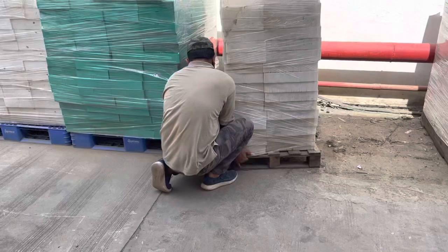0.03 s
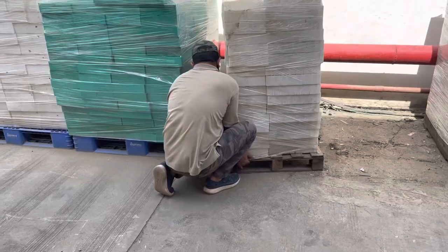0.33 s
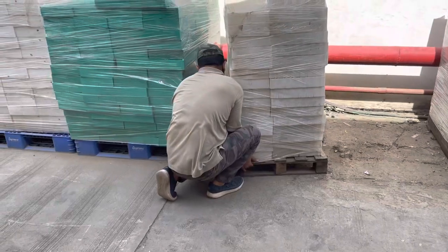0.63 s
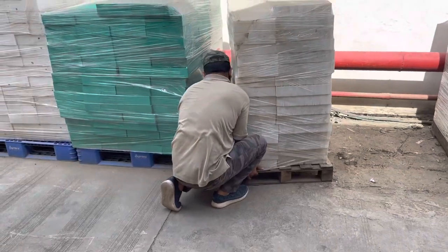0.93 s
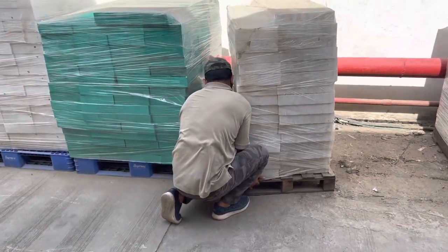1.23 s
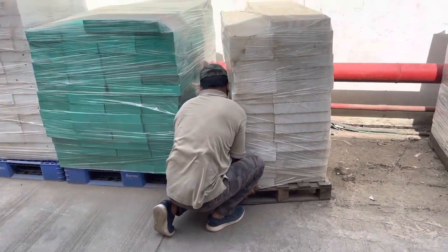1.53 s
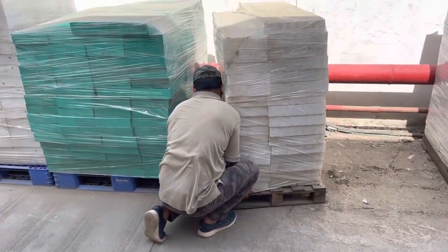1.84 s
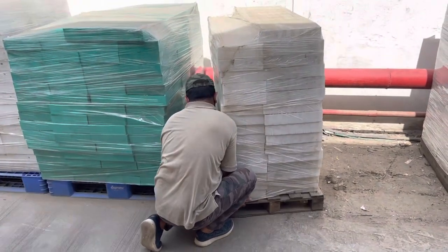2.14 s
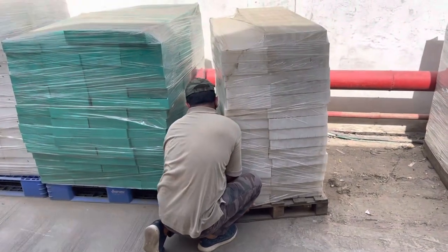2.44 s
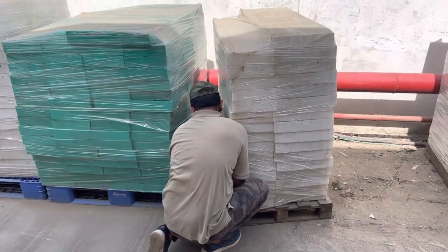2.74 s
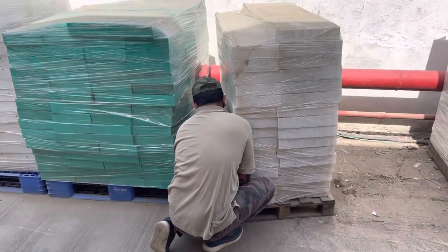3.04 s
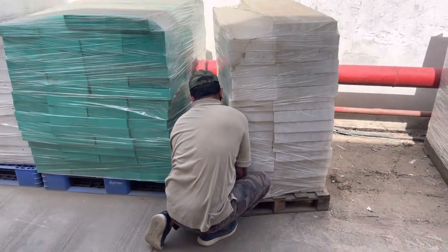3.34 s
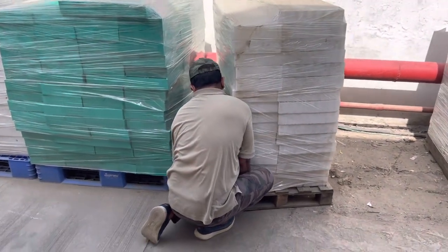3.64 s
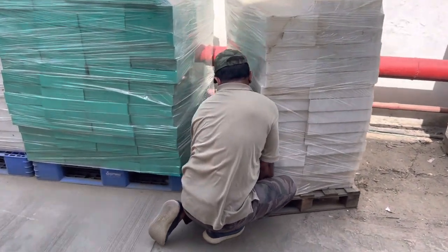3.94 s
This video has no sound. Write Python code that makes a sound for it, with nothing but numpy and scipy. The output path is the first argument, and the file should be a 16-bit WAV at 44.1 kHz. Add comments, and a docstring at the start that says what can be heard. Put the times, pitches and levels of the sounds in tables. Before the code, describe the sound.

Distant machinery rumbles and hums steadily throughout in a concrete yard, with a thin, high motor whine fading in and out. A faint whistle swells twice around 1.6 and 2.1 seconds, and far air hisses from 1.8 to 2.6. Light gusts buffet the microphone, mostly after 2 seconds. A soft low knock comes at 3.5, then plastic wrap rustles and scrapes, with a short high squeak at 3.9.

```python
"""Distant machines rumble and hum across a concrete factory yard, and one whistles faintly.
An inverter (a fast electric switch) feeds a motor and makes it whine near 5 kHz.
Air hisses from a far valve for most of a second, and light gusts buffet the microphone.
Near the end comes a soft knock, then plastic wrap rustles, scrapes and gives a short squeak."""
import sys
import numpy as np
from scipy import signal
from scipy.fft import rfft, irfft
from scipy.io import wavfile

SR = 44100
rng = np.random.default_rng(int(sys.argv[2]) if len(sys.argv) > 2 else 0)


def bounce(signal):
    """Save signal as a 16-bit WAV file at the path given by the first command-line argument."""
    frames = np.transpose(np.atleast_2d(signal))
    limited = np.clip(frames, -1, 1)
    pcm = np.round(limited * 32767).astype(np.int16)
    wavfile.write(sys.argv[1], SR, pcm)


N = 176400
TIME = np.arange(N) / SR

# "Mid" is the sound both ears share; "side" is how they differ.
# the mid part of the machines' roar: (frequency [Hz], level [dB])
ROAR_MID = [(20, -85), (32, -57), (48, -45), (115, -47.5), (195, -53), (240, -54.5), (420, -59), (700, -62),
            (1100, -66.5), (1500, -71), (2900, -77), (4200, -80.5)]
WANDER_HZ = 0.87  # how far the machines' tones stray in pitch


def roar():
    """Far machinery blurred by the yard: a fluttering rumble under thin hiss."""
    # the side part of the roar: (frequency [Hz], level [dB])
    roar_side = [(20, -85), (55, -71), (115, -76), (200, -65), (550, -61.5), (950, -66.5), (1600, -73.5),
                 (2900, -78.5), (4200, -80.5)]
    # steady hiss above it: (frequency [Hz], mid level [dB], side level [dB])
    thin_hiss = [(4190, -83, -91), (5740, -88, -81), (6400, -85.5, -93), (6950, -87.5, -93),
                 (8380, -103, -82), (9620, -89, -82), (11530, -93, -95), (12800, -101, -115),
                 (14000, -105, -125)]
    top_hz = thin_hiss[0][0]
    rumble = stereo(noise(ROAR_MID, high_hz=top_hz), noise(roar_side, high_hz=top_hz))
    flutter = from_db(-0.89 + 1.02 * drift(16))
    return flutter * rumble + hiss(thin_hiss)


def hums():
    """Engine and fan tones, wavering on their way across the yard."""
    # the clearest tones: (pitch [Hz], level [dB], side compared with mid [dB])
    engine_tones = [(38.4, -51, -20), (54.6, -32.5, -19), (74.53, -32.5, -36), (109.7, -32.5, -9.5),
                    (125.7, -37, -25), (222.9, -42.5, -10), (238.5, -41.5, -17), (300.4, -44.5, -11),
                    (380.3, -48.5, -28), (426.4, -48.5, -15), (643, -47.5, -22), (1892, -58.5, 0),
                    (2370, -61, -9), (2080, -59, -3)]
    # other machines add 40 faint tones at random pitches, just above the roar
    low_hz, high_hz = 800.2, 4189
    faint_hz = low_hz * (high_hz / low_hz) ** rng.random(40)
    roar_hz, roar_db = np.transpose(ROAR_MID)
    faint_db = np.interp(np.log(faint_hz), np.log(roar_hz), roar_db) + 9
    faint_tones = [(hz, db, -1) for hz, db in zip(faint_hz, faint_db)]
    out = 0
    for hz, db, side_db in list(engine_tones) + faint_tones:
        pitch = hz + WANDER_HZ * drift(2.69)
        mid, side = [from_db(2.5 * drift(2.23)) * tone(pitch) for _ in range(2)]
        out = out + from_db(db) * stereo(mid, from_db(side_db) * side)
    return out


def motor():
    """Electric switching makes a motor whine; echoes make it fade and shift differently at each ear."""
    # four main tones as the microphone moves through the echoes, each: (time [s], level [dB])
    low_tone = [(0.06, -57), (0.241, -47), (0.36, -47), (0.46, -43), (0.64, -40.5), (0.71, -43),
                (0.77, -60), (0.94, -58), (1.02, -47), (1.1, -54), (1.2, -48), (1.37, -51), (1.48, -49),
                (1.79, -56), (1.91, -48), (2.01, -61), (2.1, -41), (2.25, -51.5), (2.5, -45), (2.61, -54),
                (3.2, -60), (3.47, -51), (3.54, -57), (3.7, -50.5), (3.98, -56)]
    high_tone = [(0.06, -62), (0.65, -63), (0.73, -51), (0.86, -44), (0.94, -57), (1.02, -42), (1.21, -53),
                 (1.33, -42.5), (1.49, -56), (1.61, -45), (1.68, -67), (1.77, -47), (2.02, -53),
                 (2.12, -49), (2.3, -61), (2.48, -43.5), (2.6, -62), (2.67, -41.5), (2.82, -47),
                 (2.95, -59), (3.36, -56), (3.4, -43.5), (3.49, -40), (3.535, -60), (3.6, -43),
                 (3.665, -55), (3.72, -43.5), (3.82, -62), (3.93, -49)]
    third_tone = [(0.06, -51.5), (0.62, -51.5), (0.81, -59), (1.92, -46), (2.04, -60), (2.1, -51),
                  (2.17, -59), (3.35, -69), (3.5, -55), (3.98, -65)]
    fourth_tone = [(0.06, -59), (1.08, -58), (1.18, -51), (1.65, -55), (1.85, -55), (2.4, -53), (2.7, -63)]
    # the side part of the high tone: (time [s], level [dB])
    high_side = [(0.06, -53), (0.68, -58), (0.82, -43), (1.05, -65), (1.24, -45), (1.62, -44), (1.9, -52),
                 (2.2, -54), (2.47, -42), (2.63, -53), (3.02, -45), (3.24, -42), (3.38, -52), (3.49, -38),
                 (3.57, -52), (3.97, -48)]
    # weaker tones around the main ones: (pitch [Hz], level [dB])
    weak_tones = [(4626, -76), (4693, -57), (4775, -55.5), (4975, -72), (5025, -70), (5125, -70),
                  (5225, -60), (5306, -56.5), (5456, -60)]
    # their shared rise and fall: (time [s], level [dB])
    weak_swell = [(0, -6), (.8, -1), (2.7, -1), (3.2, -1), (3.5, -4)]
    # rasp of the motor's casing: (frequency [Hz], level [dB])
    rasp = [(4250, -86), (4550, -80.5), (5000, -75), (5380, -76.5), (5560, -109)]
    high_hz, boost_db = 5074.5, 0.5
    main = [(4924.8, low_tone), (high_hz, high_tone), (4875.0, third_tone), (4543.0, fourth_tone)]
    tones = [(hz, in_time(level)[0] + boost_db) for hz, level in main]
    swell_db = in_time(weak_swell)[0] - 1.5
    tones += [(hz, db + swell_db + 7.5 * np.tanh(drift(6.3))) for hz, db in weak_tones]
    out = stereo(noise(rasp, rasp[0][0], rasp[-1][0]), noise(rasp, rasp[0][0], rasp[-1][0]))
    for hz, db in tones:
        angle = 2 * np.pi * (hz * TIME + rng.random()) + 0.42 * drift(2.6)
        side_db = (db + db.mean()) / 2 - 3 + 4.1 * drift(1.8)
        if hz == high_hz:
            side_db = in_time(high_side)[0] + boost_db
        mid = from_db(db) * np.sin(angle)
        side = from_db(side_db) * np.cos(angle + 0.6 * drift(2.5))
        out = out + np.sqrt(2) * stereo(mid, side)
    return out * from_db([[1], [-1]])  # a little to the left


def gusts():
    """Swirling air hits the microphone in short, low swells."""
    # each gust: (time [s], half length [s], level [dB], centre frequency [Hz])
    puffs = [(0.764, 0.097, -26.5, 111), (1.486, 0.02, -24, 111), (2.156, 0.0095, -22, 75),
             (2.254, 0.032, -18.5, 76), (2.695, 0.031, -26, 81), (3.098, 0.04, -19.5, 84),
             (3.207, 0.013, -19.5, 89), (3.441, 0.015, -13.5, 109), (3.488, 0.016, -23, 170),
             (3.556, 0.01, -20, 104), (3.603, 0.015, -15, 95), (3.745, 0.038, -28.5, 132)]
    # the tone colour of a gust: (multiple of its centre frequency, level [dB])
    colour = [(.3, -33), (.65, -3.5), (1, 4), (1.5, -10.5), (2.6, -14.5), (5.5, -42), (18, -65)]
    out = 0
    for peak_s, half_s, db, hz in puffs:
        swell = np.exp(-.5 * ((TIME - peak_s) / half_s) ** 2)
        spectrum = [(hz * multiple, level) for multiple, level in colour]
        mid, side = [rms_one(swell * noise(spectrum, 25, 2000)) for _ in range(2)]
        strength = from_db(db) * np.sqrt(np.mean(swell ** 2))
        out = out + strength * stereo(mid, from_db(-12) * side)
    return out


def valve():
    """Compressed air spurts out, holds, and is shut off, leaving a faint tail in the yard."""
    # the jet of air: (frequency [Hz], mid level [dB], side level [dB])
    jet = [(2450, -88, -98), (4300, -77, -81), (6300, -82.5, -82), (7200, -83, -86), (8300, -130, -80),
           (9900, -85, -81), (10800, -85, -82), (12900, -90, -110), (15500, -98, -120)]
    open_s, rise_s, shut_s, fade_s = 1.78, 0.02, 2.58, 0.068
    since_open, since_shut = np.maximum(TIME - open_s, 0), np.maximum(TIME - shut_s, 0)
    flow = np.minimum(since_open / rise_s, 1) * np.exp(-since_shut / fade_s)
    spurt_db = 2.5 * np.exp(-since_open / .08)
    return from_db(-0.9 + spurt_db + 0.73 * drift(15)) * flow * hiss(jet)


def squeak():
    """Plastic wrap sticks and slips so fast that it gives a short, high note."""
    # the note's path: (time [s], pitch [Hz], level [dB])
    note = [(3.85, 4490, -72), (3.876, 4510, -45), (3.902, 4490, -52), (3.913, 4510, -33.5),
            (3.935, 4590, -48.5), (3.962, 4534, -45), (3.995, 4500, -69)]
    # the tones within the note: (multiple of the pitch, level [dB])
    harmonics = [(1, 6.5), (2, -10.5), (3, -21)]
    pitch, db = in_time(note)
    jitter_hz = 16.8
    shaky_pitches = [pitch + jitter_hz * drift(rate) for rate in (121, 120)]
    mid, side = [sum(from_db(level) * tone(multiple * hz) for multiple, level in harmonics)
                 for hz in shaky_pitches]
    loudness = from_db(db + 1.5 * drift(100)) * (TIME > note[0][0])
    return loudness * stereo(mid, from_db(-6) * side)


def scrape():
    """Rubbing plastic wrap makes a grainy noise."""
    # how loud the rub is: (time [s], level [dB])
    swell = [(3.55, -20), (3.68, -9), (3.78, -12), (3.885, -3), (3.93, -6.5), (4.0, -8)]
    # its tone colour: (frequency [Hz], level [dB])
    colour = [(900, -77), (2000, -67.5), (3200, -68.5), (5000, -92), (7000, -97), (15000, -125)]
    loudness = from_db(in_time(swell)[0] + 2 * drift(90)) * (TIME > swell[0][0])
    return loudness * stereo(noise(colour), noise(colour))


def rustle():
    """Plastic wrap crinkles finely and brightly, swelling ahead of the squeak."""
    # how loud the crinkles are: (time [s], level [dB])
    swell = [(3.55, -22), (3.74, -22), (3.8, -4), (3.9, -6.5), (4.0, -14)]
    # their tone colour: (frequency [Hz], mid level [dB], side level [dB])
    colour = [(3000, -75, -82), (6600, -80.5, -84), (8400, -100, -79), (11000, -86, -85),
              (15500, -101, -125)]
    grains = rms_one(from_db(4 * drift(250)))
    return from_db(in_time(swell)[0]) * (TIME > swell[0][0]) * grains * hiss(colour)


def scuff():
    """A brief dull rub at the height of the squeak."""
    # its tone colour: (frequency [Hz], level [dB])
    colour = [(350, -61), (700, -57.5), (1300, -75)]
    peak_s, half_s = 3.915, 0.012
    swell = np.exp(-.5 * ((TIME - peak_s) / half_s) ** 2)
    return swell * noise(colour, colour[0][0], colour[-1][0])


def knock():
    """A soft knock on the microphone's housing: one low thump that dies quickly."""
    start_s, pitch_hz, fade_s = 3.481, 125, .006
    age = np.maximum(TIME - start_s, 0)
    return -from_db(-4.5) * np.exp(-age / fade_s) * np.sin(2 * np.pi * pitch_hz * age)


def whistle():
    """A far machine gives a thin tone that swells twice."""
    # how loud it is: (time [s], level [dB])
    swell = [(1.3, -64), (1.6, -49), (1.98, -63), (2.09, -48.5), (2.27, -56), (2.4, -66)]
    pitch_hz = 2891 + WANDER_HZ * drift(2.3)
    return from_db(in_time(swell)[0]) * stereo(tone(pitch_hz), .5 * tone(pitch_hz))


def from_db(db):
    """Turn decibels into a number to multiply by."""
    return 10 ** (np.asarray(db) / 20)


def rms_one(x):
    """Scale a signal so its average strength (rms) is 1."""
    return x / np.sqrt(np.mean(x ** 2) + 1e-20)


def in_time(rows):
    """Turn each column after the time into a curve with one value per sample."""
    times, *columns = np.transpose(rows)
    return [np.interp(TIME, times, column) for column in columns]


def drift(rate_hz):
    """Smooth random wandering of typical size 1; a higher rate wanders faster."""
    step, warm_up = 40, 2000
    memory = np.exp(-2 * np.pi * step * rate_hz / SR)
    draws = rng.standard_normal(N // step + warm_up + 2)
    smooth = signal.lfilter([1], [1, -2 * memory, memory * memory], draws)[warm_up:]
    return np.interp(np.arange(N) / step, np.arange(len(smooth)), rms_one(smooth))


def noise(spectrum, low_hz=0, high_hz=SR):
    """Noise shaped by (frequency [Hz], level [dB per Hz]) rows, falling steeply outside its edges."""
    hz = np.maximum(np.arange(N // 2 + 1) * SR / N, 1)
    points, db = np.transpose(spectrum)
    gain = from_db(np.interp(np.log(hz), np.log(points), db))
    gain = gain / np.sqrt((1 + (low_hz / hz) ** 20) * (1 + (hz / high_hz) ** 20))
    return irfft(rfft(rng.standard_normal(N)) * gain, N) * np.sqrt(SR / 2)


def stereo(mid, side):
    """Left and right from mid and side."""
    return np.array([mid + side, mid - side])


def hiss(table):
    """Stereo noise from rows of frequency, mid level and side level."""
    table = np.array(table)
    return stereo(*[noise(table[:, [0, k]], low_hz=table[0, 0]) for k in (1, 2)])


def tone(hz):
    """A pure tone of average strength 1 on a steady or moving pitch."""
    cycles = np.cumsum(hz + np.zeros(N)) / SR + rng.random()
    return np.sqrt(2) * np.sin(2 * np.pi * cycles)


def scene():
    """Everything heard in the yard."""
    machines = (roar() + hums() + whistle()) * from_db([[0.16], [-0.16]])  # barely to the left
    return machines + motor() + gusts() + knock() + valve() + squeak() + scrape() + rustle() + scuff()


def record(dry):
    """The sound starts after a moment of silence, and the highest treble is cut."""
    start_s, stop_hz = .036, 16500
    treble_cut = signal.cheby2(16, 70, stop_hz, fs=SR, output="sos")
    return signal.sosfilt(treble_cut, dry * (TIME > start_s) + 1e-18)


dry = scene()
out = record(dry)
bounce(out)
```